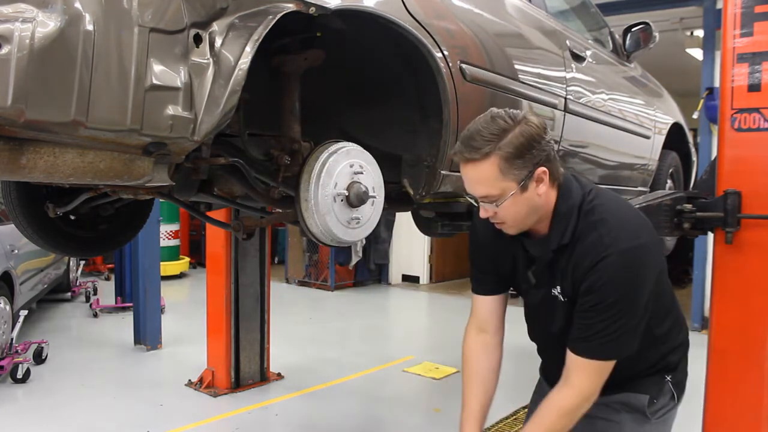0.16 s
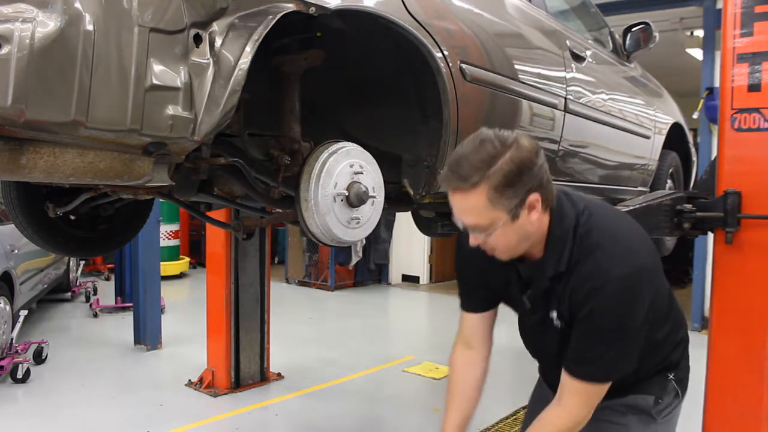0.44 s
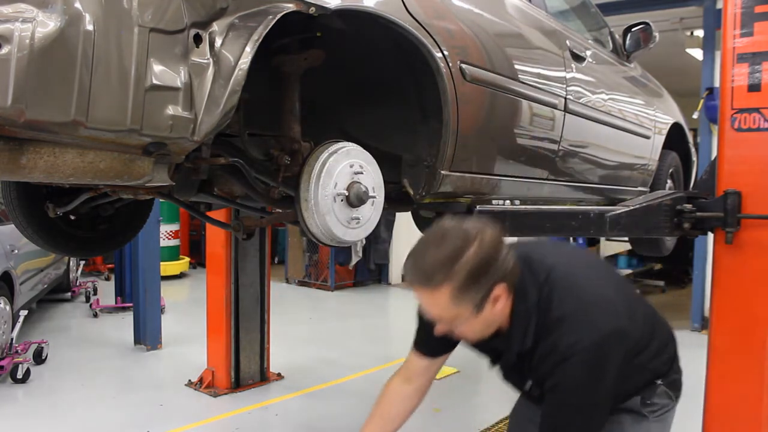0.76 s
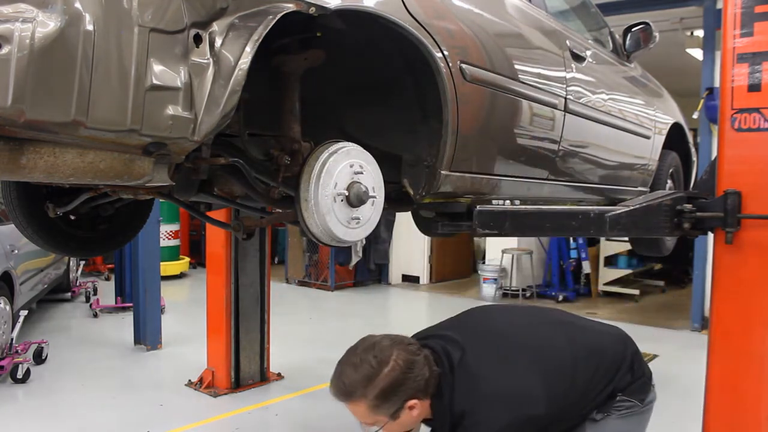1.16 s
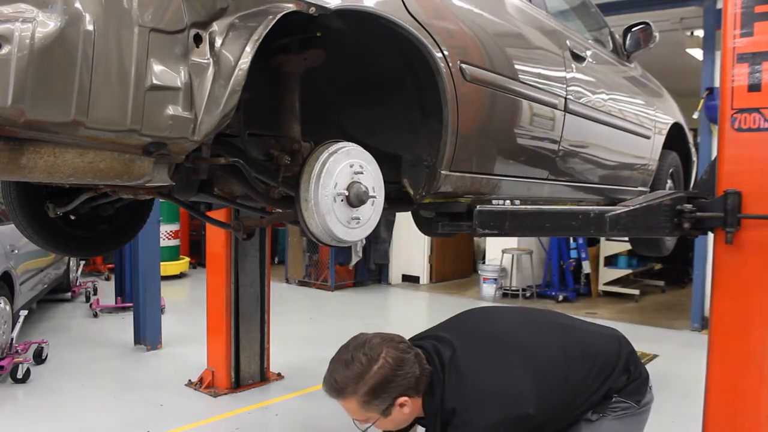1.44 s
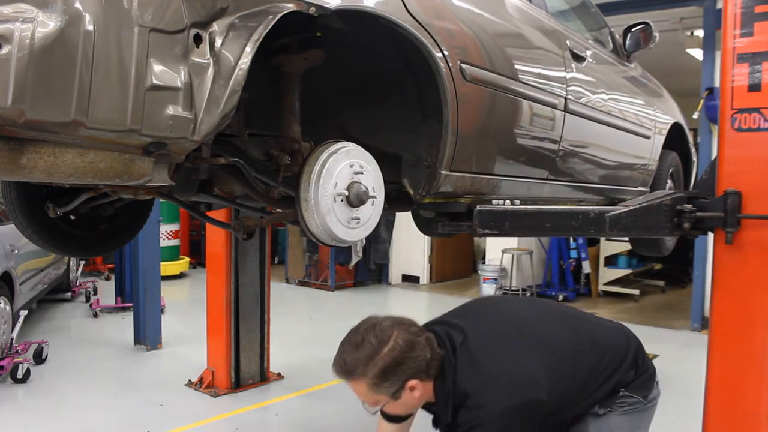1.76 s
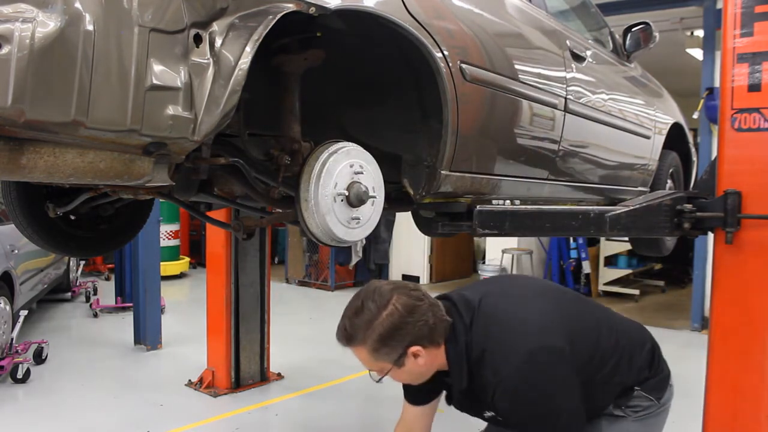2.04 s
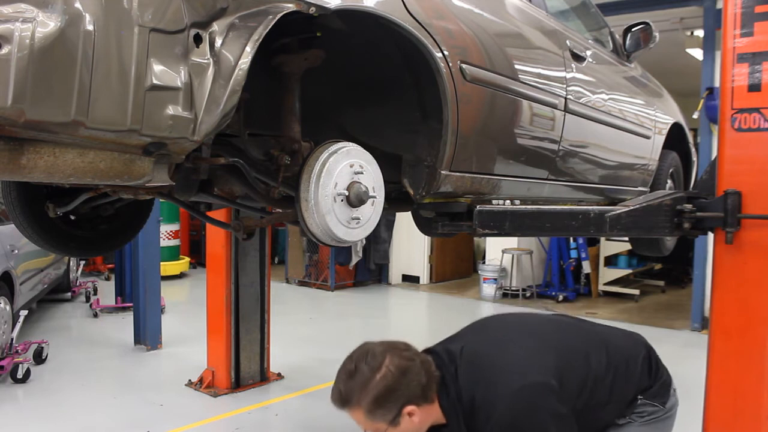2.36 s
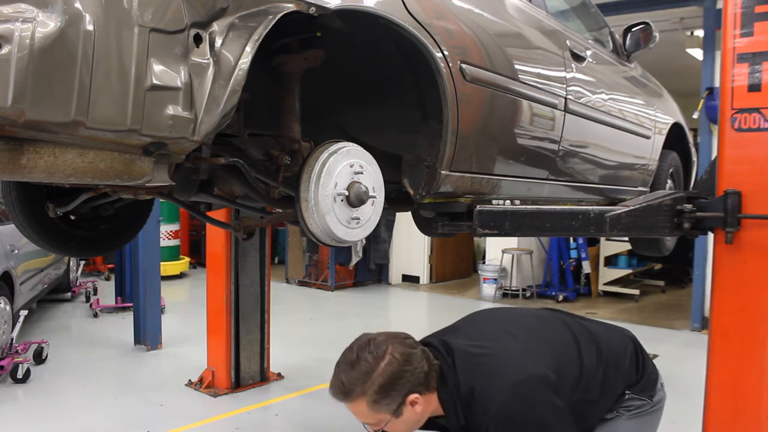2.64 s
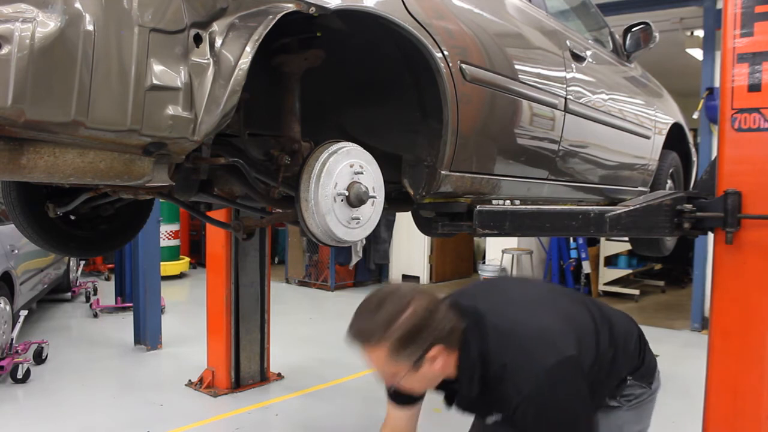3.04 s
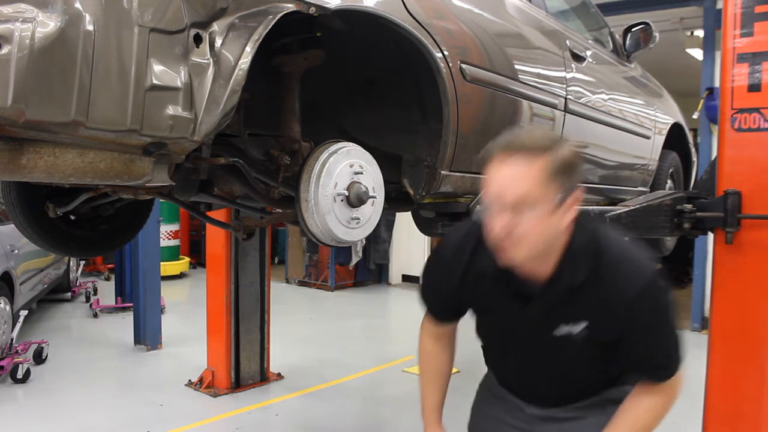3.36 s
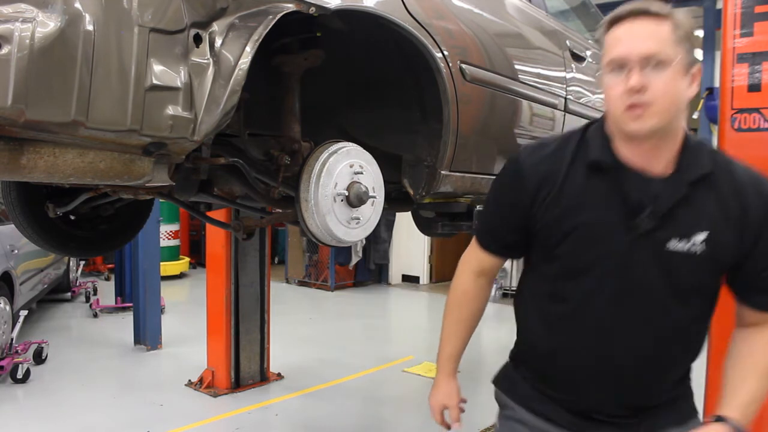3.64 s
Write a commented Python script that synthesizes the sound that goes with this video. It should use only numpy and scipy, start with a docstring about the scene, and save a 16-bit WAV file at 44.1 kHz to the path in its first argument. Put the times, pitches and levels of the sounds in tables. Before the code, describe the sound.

Cloth rustles and a small tick, then rubber scuffs, gritty crunches and hollow wheel knocks; after a short lull the heavy wheel slams onto concrete and rattles still, heard fairly close in an echoing garage.

```python
"""Heavy wheel laid down in a workshop

A heavy steel wheel with its tyre is handled, knocks as it is tipped, then drops flat on concrete and bounces to rest.
Each blow is a filtered crack and short rattle plus ringing modes of tyre air, tyre wall and steel rim.
Tyre scuffs, rustling clothes and shoes and crunching grit are clumped noise grains; ticks are short noise snaps.
Filtered noise and fan tones make the ventilation; a diffuse tail makes the large room."""
import sys
import numpy as np
from scipy import signal
from scipy.fft import rfft, irfft
from scipy.io import wavfile

SR = 44100
rng = np.random.default_rng(int(sys.argv[2]) if len(sys.argv) > 2 else 0)


def persist_wave(psi):
    """Save psi, clipped to +-1, as 16-bit WAV."""
    counts = np.round(np.clip(psi, -1, 1) * 32767).astype(np.int16)
    wavfile.write(sys.argv[1], SR, np.atleast_2d(counts).T)


N = 167580
TREBLE_HZ = 2050  # corner of every treble_db


def amp(db):
    """Decibels to gain."""
    return 10 ** (np.asarray(db) / 20)


def unit(x):
    """Scales to rms 1."""
    return x / np.sqrt(np.mean(x ** 2) + 1e-20)


def read(points, hz):
    """Reads a curve on a log-frequency axis."""
    f, value = np.transpose(points)
    return np.interp(np.log(hz + 1), np.log(f), value)


def add(mix, s, sound):
    """Mixes a sound in at a time in seconds."""
    part = mix[max(round(s * SR), 0):][:len(sound)]
    part += sound[:len(part)]


def colour(x, curve, size=8192):
    """Causal minimum-phase filter from a function that gives dB at each frequency."""
    hz = abs(np.fft.fftfreq(size, 1 / SR))
    log_gain = np.log(amp(curve(hz)))
    spectrum = np.exp(np.conj(signal.hilbert(log_gain)))
    taps = np.fft.ifft(spectrum).real[:size // 2]
    return signal.fftconvolve(x, taps)[:len(x)]


def above(hz, corner_hz):
    """Smooth step from 0 to 1 around a corner."""
    return 1 - 1 / (1 + (hz / corner_hz) ** 4)


def bump(hz, centre_hz, octaves):
    """Bell of height 1 on a log-frequency axis."""
    return np.exp(-(np.log2((hz + 1) / centre_hz) / octaves) ** 2)


def ventilation():
    """Steady rush of air with faint fan tones."""
    # relative spectrum of the rush: hz, level_db
    air = [(15, -47), (25, -29), (97, -0.5), (256, -5.5), (309, -4.5), (373, -5), (560, -14), (818, -16.5),
           (936, -22), (1040, -18), (1560, -28.5), (3250, -30), (4250, -29.5), (8590, -37), (16000, -48)]
    # fan tones: hz, rms_level_db
    hum = [(120, -69), (361, -65.5)]
    rush_db = -58.5
    t = np.arange(N) / SR
    gain = amp(read(air, np.fft.rfftfreq(N, 1 / SR)))
    rush = irfft(rfft(rng.standard_normal(N)) * gain, N)
    tones = sum(amp(db) * unit(np.sin(2 * np.pi * (hz * t + rng.random()))) for hz, db in hum)
    return amp(rush_db) * unit(rush) + tones


def slide(curve, peak_s, rise_s, fall_s, level_db, treble_db=0):
    """Friction: dense tiny slips, in clumps, that swell and die away."""
    grains_per_s, grain_spread_db = 7000, 1
    catch_db, catch_s = 1.5, 0.0069  # the surfaces catch and let go unevenly
    since_start_s = np.arange(N) / SR
    t = since_start_s - peak_s
    struck = rng.random(N) < grains_per_s / SR
    strength = amp(grain_spread_db * np.minimum(rng.exponential(1, N), 4))
    slips = rng.standard_normal(N) * struck * strength
    catches = amp(catch_db * np.interp(since_start_s / catch_s, np.arange(N), rng.standard_normal(N)))
    stroke = np.exp(1 - np.sqrt(1 + 2 * (t / np.where(t < 0, rise_s, fall_s)) ** 2))
    rub = unit(colour(slips * catches, curve)) * stroke
    return amp(level_db) * colour(rub, lambda f: treble_db * above(f, TREBLE_HZ))


def rustles():
    """Cloth and soles slide, each stroke with a swish at its own pitch."""
    # strokes: peak_s, rise_s, fall_s, level_db, treble_db, swish_hz
    strokes = [(0.039, 0.18, 0.042, -59.5, 4.5, 6250), (0.205, 0.043, 0.039, -58, 5.5, 1390),
               (0.70, 0.055, 0.14, -64, 1.5, 8100), (0.849, 0.063, 0.09, -63.5, 6.5, 4300),
               (1.11, 0.061, 0.033, -60.5, 2.5, 4300), (1.33, 0.22, .14, -74, 15, 9100),
               (1.55, 0.069, 0.017, -69, 9, 6640), (1.635, 0.017, 0.024, -62.5, 7.5, 6940),
               (2.07, 0.19, 0.087, -61, 3, 5560), (2.351, 0.027, 0.02, -58, 3, 6700),
               (2.522, 0.049, 0.036, -61, 0.5, 4100), (3.14, 0.031, 0.093, -60.5, 0.5, 5740),
               (3.45, 0.28, 0.32, -60, 2, 4400)]
    # relative spectrum without the swish: hz, level_db
    cloth = [(100, 1), (400, -2.5), (800, 0), (1450, -1.5), (2300, -9.5), (4100, -11), (5200, -15.5),
             (6700, -16.5), (9500, -22), (12000, -32.5), (16000, -40)]
    swish_db, swish_octaves = 6.5, 0.32
    return sum(slide(lambda f: read(cloth, f) + swish_db * bump(f, hz, swish_octaves), *row)
               for *row, hz in strokes)


def tick(level_db, t60_s):
    """A brief bright snap: coloured noise with a fast rise and exponential decay."""
    # relative spectrum: hz, level_db
    snap_curve = [(200, -27), (1600, -8.5), (2400, -11), (3600, 0.5), (5300, 2), (7500, -10.5),
                  (11000, -22), (16000, -31)]
    rise_s = 0.00067
    t = np.arange(SR // 8) / SR
    snap = unit(colour(rng.standard_normal(len(t)), lambda f: read(snap_curve, f)))
    decay = amp(level_db - 60 * np.maximum(t - rise_s, 0) / t60_s)
    return snap * np.minimum(t / rise_s, 1) * decay


def scuffs():
    """Rubber drags on concrete."""
    # drags: peak_s, rise_s, fall_s, level_db, treble_db
    drags = [(0.762, 0.0088, 0.006, -49, -6), (0.83, 0.042, 0.042, -55.5, 8.5),
             (0.944, 0.0054, 0.012, -39.5, 3), (0.959, 0.0066, 0.012, -31, 4),
             (1.085, 0.0065, 0.026, -52.5, 6), (1.294, 0.012, 0.0083, -35.5, -7.5),
             (1.38, 0.1, 0.17, -55, -33), (2.787, 0.017, 0.014, -52.5, 1.5)]
    # relative spectrum: hz, level_db
    rubber = [(60, -28), (200, -2.5), (380, 6), (800, -7), (1050, -1.5), (1330, -7.5), (1900, -23),
              (3300, -15), (4800, -25.5), (6600, -23.5), (10000, -35.5), (16000, -47)]
    return sum(slide(lambda f: read(rubber, f), *row) for row in drags)


def crunches():
    """Grit crunches under the tyre in very short strokes."""
    # crunches: peak_s, level_db, rise_and_fall_s
    strokes = [(0.842, -59.5, 0.0047), (0.856, -52, 0.0013), (0.865, -50, 0.0016), (0.891, -60, 0.011),
               (0.971, -47.5, .006), (1.086, -53.5, .005), (1.157, -60.5, .004)]
    # relative spectrum: hz, level_db
    grit = [(500, -28), (3500, 1), (6500, 7), (10000, -1), (16000, -30)]
    return sum(slide(lambda f: read(grit, f), s, length_s, length_s, db) for s, db, length_s in strokes)


def ring(modes, rise_s, t, hold):
    """Modes that swell briefly and then die away; hold scales their decay times."""
    tones = sum(amp(db - 60 * t / (t60_s * hold)) * np.sin(2 * np.pi * hz * t) for hz, db, t60_s in modes)
    return (1 - np.exp(-t / rise_s)) * tones


def blow(hold, level_db, thump_db, clonk_db, clack_db, treble_db, wall_db, rim_db):
    """A crack and a short rattle through the wheel's body, then the ring of tyre and rim."""
    # relative response of the wheel's body: hz, level_db
    body_curve = [(40, -48), (70, -18), (92, -16), (112, -14), (145, -24), (200, -13.5), (270, -2.5),
                  (350, -6.5), (455, -6.5), (585, -7), (670, -24.5), (960, -26), (1240, -13.5), (1600, -26),
                  (2000, -34), (2700, -28), (4000, -33.5), (6500, -45), (10000, -60), (16000, -79)]
    # dense short ringing against the first crack: hz, level_db
    rattle_curve = [(100, -22), (500, -4), (1200, -2), (3000, 0.5), (10000, 6.5)]
    # modes of the air in the tyre, the tyre wall and the steel rim: hz, relative_level_db, free_t60_s
    air_modes = [(96, -23, .45), (105, -20, .14), (233, -36, .75), (330, -32, .35), (426, -33, .3)]
    wall_modes = [(274, -18, .14), (300, -22, .1)]
    rim_modes = [(612, -38, .5), (681, -49, .6), (1009, -45, .4), (1056, -35, .55), (1177, -42, .4),
                 (1549, -54, .55), (1885, -58, .6), (2330, -59, .55), (2556, -58, .6), (2822, -59, .55),
                 (3180, -57, .65)]
    thump_hz = 139
    clonk_hz, clonk_octaves = 473, 0.78
    clack_hz, clack_octaves = 2720, 0.42
    rattle_t60_s, rattle_rise_s = 0.077, 0.0015
    tyre_rise_s, rim_rise_s = 0.007, 0.0047

    def body(f):
        return read(body_curve, f)

    def contact(f):
        low = thump_db * (1 - above(f, thump_hz)) + clonk_db * bump(f, clonk_hz, clonk_octaves)
        high = clack_db * bump(f, clack_hz, clack_octaves) + treble_db * above(f, TREBLE_HZ)
        return low + high

    t = np.arange(SR) / SR
    click = 1. * (t == 0)
    envelope = np.minimum(t / rattle_rise_s, 1) * amp(-60 * t / rattle_t60_s)
    rattle = unit(rng.standard_normal(SR) * envelope) / np.sqrt(SR)  # unit energy, like the click
    crack = click + colour(rattle, lambda f: read(rattle_curve, f))
    knock = colour(crack, body) / abs(colour(click, body)).max()
    air = amp(thump_db) * ring(air_modes, tyre_rise_s, t, hold)
    wall = amp(wall_db) * ring(wall_modes, tyre_rise_s, t, 1)
    rim = amp(rim_db) * ring(rim_modes, rim_rise_s, t, hold)
    return amp(level_db) * (colour(knock, contact) + air + wall + rim)


def workshop(x):
    """The hall's diffuse tail, each band dying at its own speed."""
    # decay: hz, t60_s
    decay = [(100, 1.03), (400, 0.62), (1200, 1.06), (3000, 1.4), (7000, 0.7), (14000, 1)]
    # reverberation against direct sound, ahead of the build-up: hz, level_db
    room = [(80, 1), (300, -6.5), (500, -24.5), (900, -7.5), (1400, -15), (2000, -3.5), (2900, -12.5),
            (5000, -10), (12000, -10)]
    build_s = 0.0067
    hz, t, z = signal.stft(rng.standard_normal(2 * SR), SR, nperseg=256)
    t60_s = read(decay, hz)[:, None]
    z = z * amp(read(room, hz)[:, None] - 60 * t / t60_s)
    z = z * np.sqrt(np.log(1e6) / t60_s / SR)  # equal energy whatever the decay time
    z = z * (1 - np.exp(-t / build_s))
    return signal.fftconvolve(x, signal.istft(z, SR)[1])[:N]


def scene():
    """Wheel, friction and ticks in the room, over the ventilation; the wheel radiates little deep bass."""
    # small sharp ticks: start_s, level_db, t60_s
    ticks_table = [(0.395, -37.5, 0.004), (0.78, -49, 0.01), (1.7023, -57.5, 0.029), (1.7328, -45, 0.058),
                   (1.9555, -59.5, 0.022), (2.492, -60, 0.018)]
    # blows on the wheel, handling knocks and then the drop and bounces: start_s, level_db,
    # thump_db (also tyre air), clonk_db, clack_db, treble_db, tyre_wall_db, rim_db
    blows = [(0.9624, -20.5, 1, -2.5, -17, 0, 9, 13), (1.2855, -33.5, -20, -11, 13, -7, -14, 17),
             (1.2925, -28.5, -15, -3.5, 11, -8, 16.5, 8.5), (1.3142, -35, -19, 4, 1, -15, 3, -1),
             (1.352, -45, -25, 13, -8, 10, 8, -9), (1.42, -48.5, -15, 9, 9, 10, -6, -2),
             (1.506, -46, 7, 4, 5, 2, -1, 0), (1.5465, -26.5, -45, -3.5, -2, -6.5, 17.5, 10),
             (1.5592, -53, -13, -3, -4, -6, 20, 20), (1.6232, -23, -13.5, 3, 0.5, -5.5, 11.5, 0),
             (1.7248, -28.5, -5, 1.5, 5, -7.5, -5, 5), (1.788, -24, -27, 5.5, 8.5, -5, 4, 5),
             (1.8551, -30, 4, 0.5, 14, -14.5, 11, -7), (1.9004, -35.5, -9, 6, 0, -12, -8, -7),
             (2.4221, -29, -23, -12, 5, -16.5, -3, -11), (2.7968, -5.5, -3, 4.5, -0.5, -1, -5, 3.5),
             (2.8819, -17.5, 0, -22, 3.5, -11, -10, -17), (2.9216, -16, 2.5, 5.5, 6, -1, 4, 10.5),
             (3.0334, -26.5, -3.5, 10, 3, -2, -9, 11.5), (3.0364, -16.5, -10.5, -1, 6, -4.5, 3, -9),
             (3.128, -38.5, -25, -8, -8, 7, 11, -6), (3.175, -34, -15, 5, -13, -9, -4, -8),
             (3.273, -36.5, -6, -5, -7, -2, -16, -8)]
    drop_s, held_shortening = 2.7, .65  # hands damp the wheel until it drops
    low_cut_hz, tick_room_db = 52, -2
    near = rustles() + scuffs() + crunches()
    ticks = np.zeros(N)
    for s, *row in ticks_table:
        add(ticks, s, tick(*row))
    for s, *row in blows:
        add(near, s, blow(held_shortening if s < drop_s else 1, *row))
    near = signal.sosfilt(signal.butter(4, low_cut_hz, "high", fs=SR, output="sos"), near)
    tail = workshop(near + amp(tick_room_db) * ticks)
    return (near + ticks + tail + ventilation())[None]


def record(dry):
    """The recorder's band limit: a linear-phase low-pass."""
    edge_hz = 15900
    taps = signal.firwin(511, edge_hz, window=("kaiser", 9), fs=SR)
    return signal.oaconvolve(dry, taps[None], "same")


dry = scene()
out = record(dry)
persist_wave(out)
```